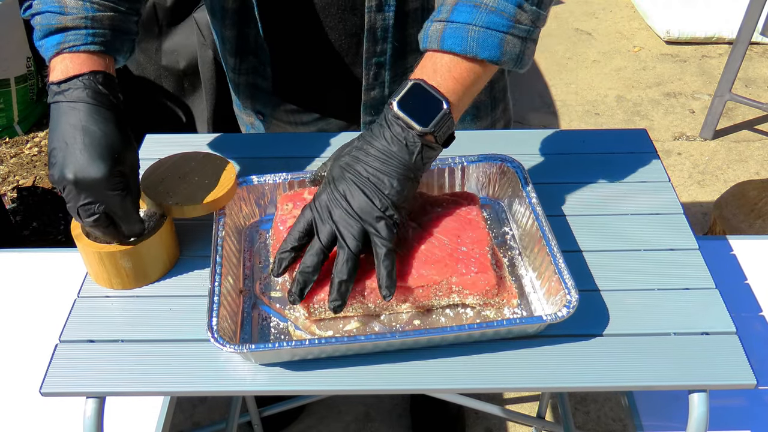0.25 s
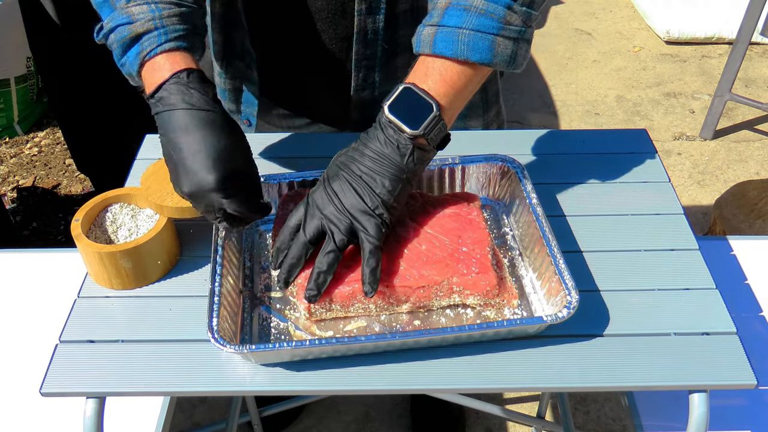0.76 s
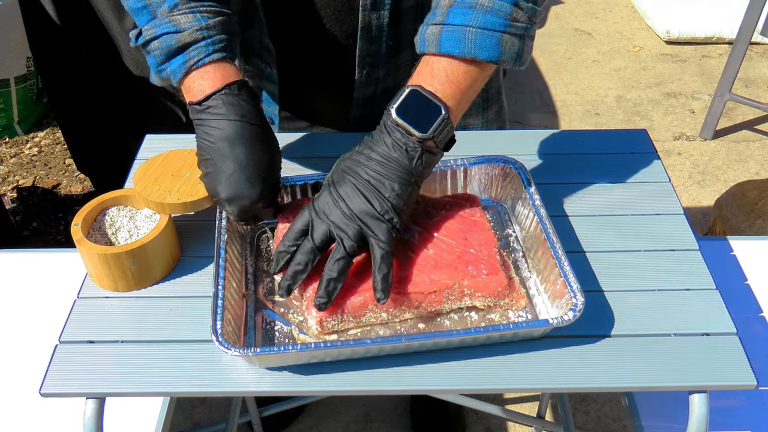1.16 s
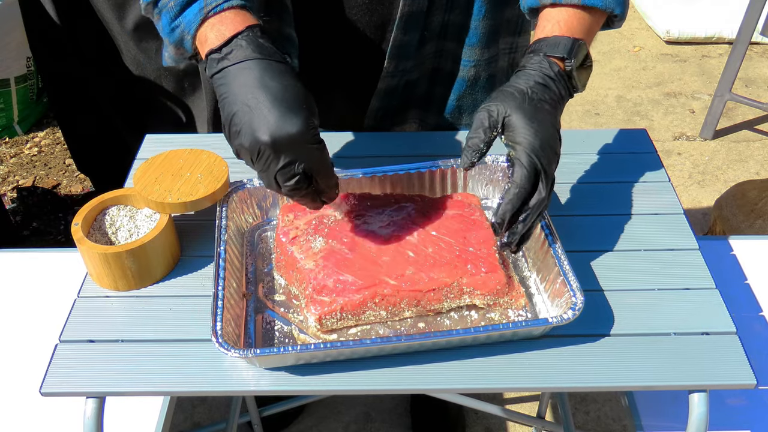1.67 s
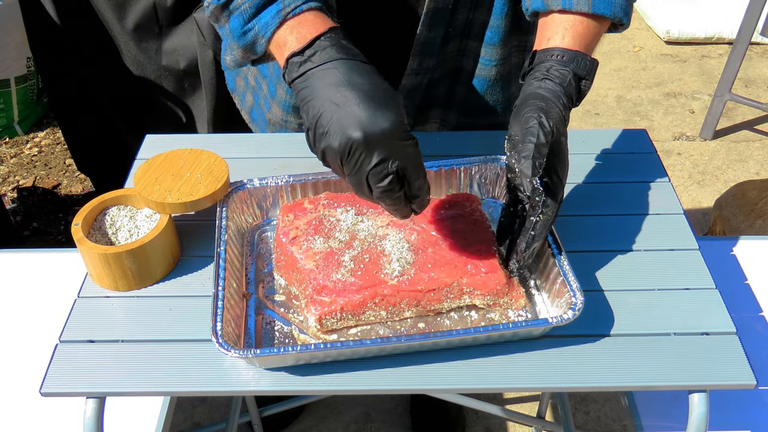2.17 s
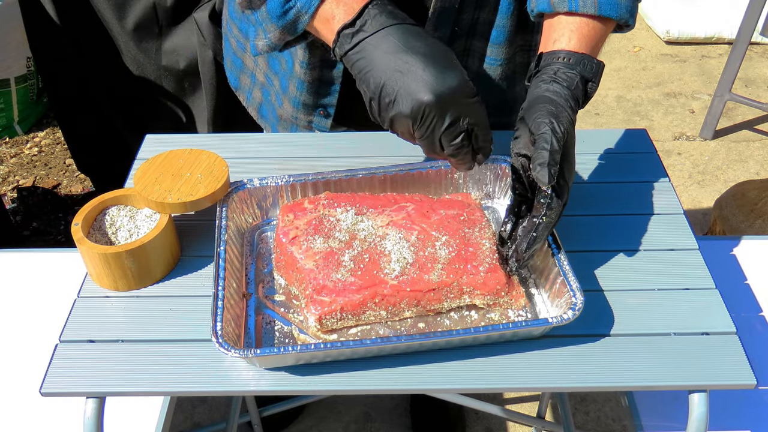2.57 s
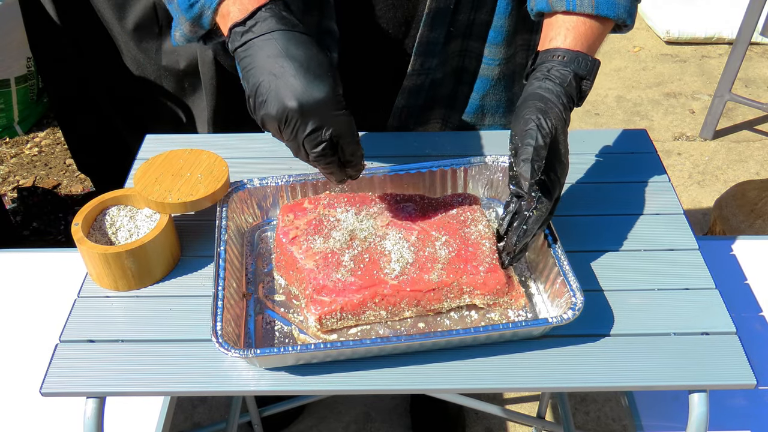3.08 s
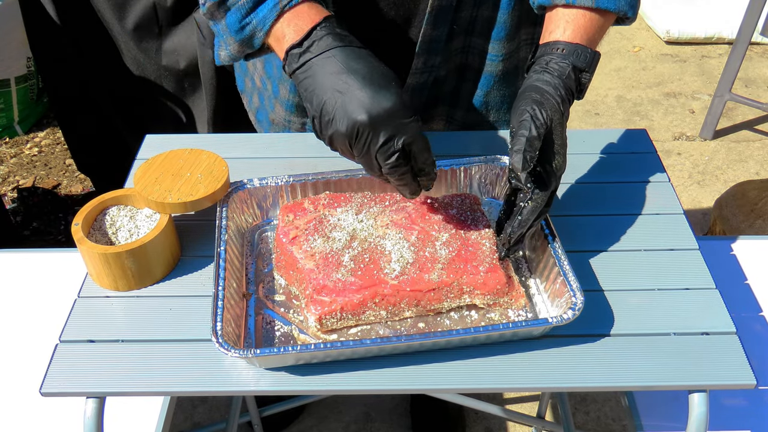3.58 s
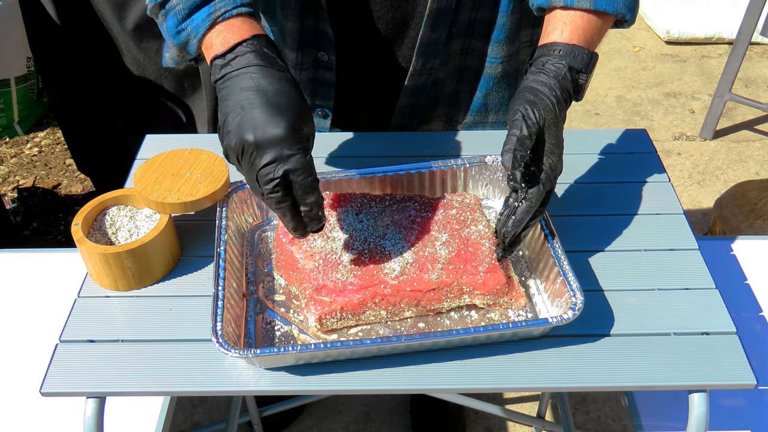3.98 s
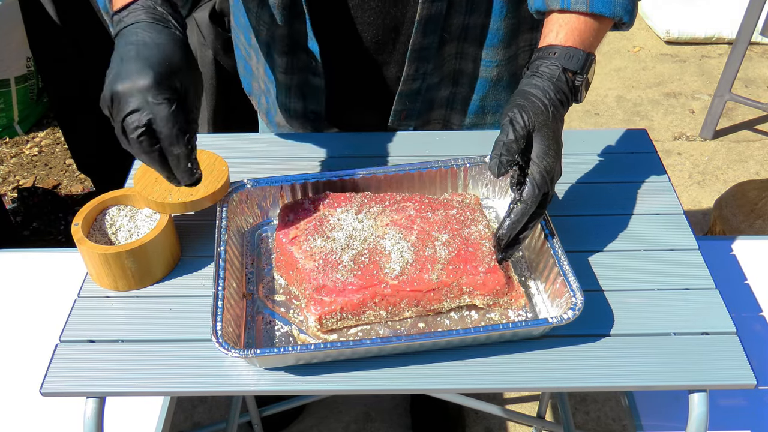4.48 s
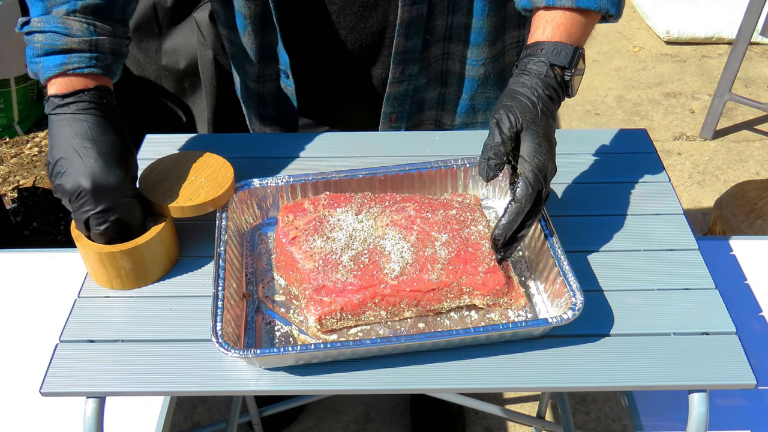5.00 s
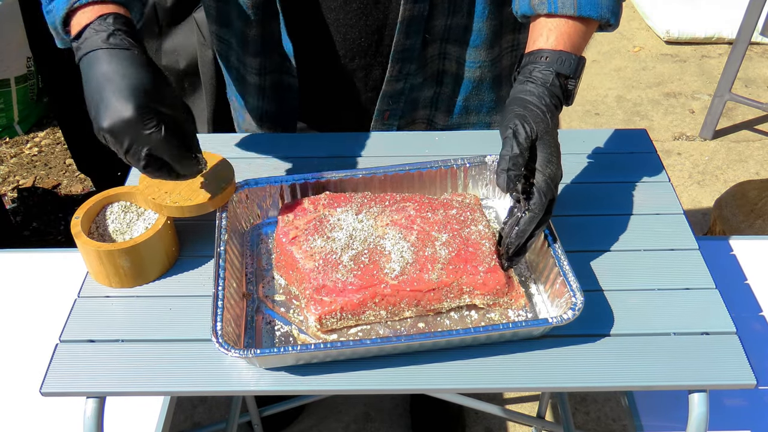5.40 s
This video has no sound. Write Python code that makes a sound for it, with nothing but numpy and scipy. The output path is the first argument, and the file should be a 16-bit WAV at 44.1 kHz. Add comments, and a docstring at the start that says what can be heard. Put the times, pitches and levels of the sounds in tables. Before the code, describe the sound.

Close outdoor sound of a disposable foil pan on a slatted table. A soft crunch of fingers in coarse salt comes first, then a short scrape with crinkling, scattered snaps, and a dense bright burst of crackling near the middle. It calms into another quiet salt scoop and one last pop. A low engine hum and faint airy hiss continue underneath.

```python
"""A thin aluminium foil pan snaps and crinkles under gloved fingers seasoning meat on an outdoor slatted table.
Each snap and tick starts a dense set of foil modes; fine random clicks add a rustle.
The pan scrapes by stick and slip, and knocks on the slats as ringing modes with a short chatter.
Fingers dig coarse salt from a wooden pot, as random grains through a resonance.
Behind them a slow engine hums, a train of firings through an exhaust, over shaped noise for open air."""
import sys
import numpy as np
from scipy import signal
from scipy.io import wavfile
from scipy.ndimage import uniform_filter1d

SR = 44100
rng = np.random.default_rng(int(sys.argv[2]) if len(sys.argv) > 2 else 0)


def dump(signal):
    """Clip the signal to [-1, 1] and save it as 16-bit WAV at the path in sys.argv[1]."""
    limited = np.clip(np.atleast_2d(signal).T, -1, 1)
    pcm = np.round(limited * 32767).astype(np.int16)
    wavfile.write(sys.argv[1], SR, pcm)


N = 249165
TIME = np.arange(N) / SR  # s

# modes of the loaded pan on the slats: f/Hz, level/dB, free t60/s
PAN_MODES = [(282, -8, 0.12), (302, -2, 0.17), (301, -3, 0.4), (408, -8, 0.056), (500.5, -7, 0.11),
             (544, -12.5, 0.19), (657, -6.5, 0.25), (715, -16, 0.45), (815, -29, 0.11), (867, -9, 0.16),
             (970, 1, 0.028), (1066, -8.5, 0.17), (1180, -9, 0.051), (1315, -10.5, 0.13),
             (1550, -17.5, 0.45), (1740, -27, 0.063), (2650, -6.5, 0.13)]
FIRINGS_HZ, FIRST_FIRING_S = 26.5406, 0.0150  # the engine's firing rate and first firing


def amp(db):
    """Decibels to gain."""
    return 10 ** (np.asarray(db) / 20)


def unit(x):
    """Scales to rms 1."""
    return x / np.sqrt(np.mean(x ** 2) + 1e-20)


def read(points, hz):
    """A spectrum's dB at any frequency, interpolated along log frequency."""
    f, db = np.transpose(points)
    return np.interp(np.log(hz + 1), np.log(f + 1), db)


def add(mix, s, sound):
    """Mixes a sound in at time s, in place."""
    part = mix[max(round(s * SR), 0):][:len(sound)]
    part += sound[:len(part)]


def colour(x, points, size=4096):
    """Causal (minimum-phase) filter of unit energy with the given spectrum."""
    log_gain = np.log(amp(read(points, abs(np.fft.fftfreq(size, 1 / SR)))))
    response = np.exp(np.conj(signal.hilbert(log_gain)))
    taps = np.fft.ifft(response).real[:size // 2]
    return signal.oaconvolve(x, taps / np.linalg.norm(taps))[:len(x)]


def band(x, low_hz, high_hz, order=2):
    """Butterworth band-pass."""
    edges_hz = [low_hz, min(high_hz, 0.49 * SR)]
    return signal.sosfilt(signal.butter(order, edges_hz, "band", fs=SR, output="sos"), x)


def stroke(middle_s, half_s):
    """A movement of the hand that swells and dies away smoothly."""
    return np.exp(-((TIME - middle_s) / half_s) ** 2)


def engine(hum_db=-54.0, uneven=0.044, waver_s=0.00029, puff_db=-68):
    """Each firing, a little uneven in time and strength, thumps through the exhaust with a puff of noise."""
    # exhaust response: multiple of the firing rate, level/dB
    exhaust = [(1, -20), (2, -20), (3, -38.5), (4, -4), (5, 3.5), (6, -6), (7, -6), (8, -14.5), (9, -27.5),
               (10, -17.5), (11, -28), (12, -21), (13, -45), (14, -34)]
    starts = np.arange(FIRST_FIRING_S, TIME[-1] - 0.005, 1 / FIRINGS_HZ)
    late, strength = rng.standard_normal((len(starts), 2)).T
    firings = np.zeros(N)
    places = ((starts + waver_s * late) * SR).astype(int)
    firings[np.clip(places, 0, N - 1)] = 1 + uneven * strength
    pipe = [(k * FIRINGS_HZ, db) for k, db in exhaust]
    pipe += [(600, -45), (1500, -62), (5000, -90)]  # the treble falls away
    hum = unit(colour(firings, pipe, size=16384))

    cycle = ((TIME - FIRST_FIRING_S) * FIRINGS_HZ) % 1  # 0-1 from one firing to the next
    puffs = band(rng.standard_normal(N), 220, 650) * np.exp(-((cycle - 0.26) / 0.3) ** 2)
    return amp(hum_db) * hum + amp(puff_db) * unit(puffs)


def casing(waver=0.29):
    """Faint overtones of the engine: steady sines whose phase wavers slowly (in radians)."""
    # casing hums: f/Hz, rms level/dB
    hums = [(292, -68.5), (345, -88.5), (372, -94), (452, -76), (637, -80.5)]
    knots = np.linspace(0, TIME[-1], 24)
    out = np.zeros(N)
    for hz, db in hums:
        drift = waver * np.interp(TIME, knots, rng.standard_normal(len(knots)))
        out += amp(db) * np.sqrt(2) * np.sin(2 * np.pi * hz * TIME + drift)
    return out


def air(air_db=-67.5, rumble_db=-63, hiss_db=0):
    """Open-air hiss that swells and sinks over a steady low rumble, both shaped noise."""
    # hiss spectrum: f/Hz, density/dB per Hz
    hiss_spectrum = [(180, -22.5), (300, -9.5), (315, -9), (455, -14.5), (528, -15), (645, -16.5),
                     (801, -12.5), (870, -14.5), (1840, -16.5), (3190, -24.5), (7200, -23.5), (14700, -27),
                     (16000, -29)]
    # slow swell of the hiss: t/s, level/dB
    swell = [(0, 6.5), (.8, 6.5), (1.8, 6), (2.05, 3), (2.4, 5), (3.7, 6), (4.5, 3.5), (5.0, 7), (5.6, 4)]
    # rumble spectrum: f/Hz, density/dB per Hz
    rumble_spectrum = [(20, -59), (40, 0), (55, 5), (90, 2.5), (200, 6.5), (330, 10), (450, -7),
                       (800, -29.5), (2000, -66)]
    hiss = amp(air_db + hiss_db) * colour(rng.standard_normal(N), hiss_spectrum)
    rumble = amp(rumble_db) * colour(rng.standard_normal(N), rumble_spectrum, size=16384)
    return hiss * amp(np.interp(TIME, *np.transpose(swell))) + rumble


def pan_ring(middle_hz, octaves, free):
    """The pan's modes after a blow whose energy lies around middle_hz; a hand on the rim shortens them."""
    t = TIME[:SR // 2]
    out = np.zeros(len(t))
    for hz, db, t60 in PAN_MODES:
        struck = np.exp(-(np.log2(hz / middle_hz) / octaves) ** 2)
        decay = amp(db - 60 * t / (t60 * free))
        out += struck * decay * np.sin(2 * np.pi * (hz * t + rng.random()))
    return out


def knocks(rattle_db=-2, rattle_t60=0.094, rattle_s=0.066, seat_s=0.0013,
           thud_db=-42, thud_t60=0.38, thud_rise_s=0.014, thud_at_s=1.035):
    """The pan drops back, chatters briefly on the slats and rings on; the table thuds softly as the slide stops."""
    # blows: t/s, level/dB, middle of spectrum f/Hz, breadth/octaves, share of the free ring time left by the hand/0-1
    blows = [(0.0, -45, 690, 1.84, 1), (1.3129, -34, 446, 2.3, 1), (1.524, -52, 517, 0.14, .8),
             (1.605, -42.5, 650, 0.16, 1), (1.695, -61, 694, 3.3, .8), (3.2435, -34, 930, 1.1, 0.5),
             (4.282, -43.5, 1250, 0.73, 0.8), (5.644, -36.5, 1910, 0.87, 0.7)]
    out, t = np.zeros(N), TIME[:SR // 2]
    for s, db, hz, octaves, free in blows:
        chatter = amp(rattle_db - 60 * t / (rattle_t60 * free)) / (1 + (t / rattle_s) ** 4)
        rattle = unit(band(rng.standard_normal(len(t)), hz * 0.42, hz * 2.36, order=4)) * chatter
        blow = pan_ring(hz, octaves, free) + rattle * octaves / 2  # broader blows rattle more
        add(out, s, amp(db) * blow * (1 - np.exp(-t / seat_s)))
    thud = unit(band(rng.standard_normal(len(t)), 88, 168, order=4))
    add(out, thud_at_s, thud * amp(thud_db - 60 * t / thud_t60) * (1 - np.exp(-t / thud_rise_s)))
    return out


def facet(t60, pitch_hz, count=220, size=4096, spread_db=4, top_damping=0.33,
          focus_db=6, focus_octaves=0.065, uneven_db=2):
    """One facet of foil flips: dense modes, lifted near its pitch, the high ones dying first (t60 is at 5 kHz)."""
    t = np.arange(size) / SR
    hz = 300 + 16000 * ((np.arange(count) + rng.random(count)) / count) ** 1.25
    gain = amp(spread_db * rng.standard_normal(count)) * rng.choice([-1, 1], count) * hz ** 0.1
    # each crease favours its own groups of modes
    shape = unit(uniform_filter1d(rng.standard_normal(count), size=9))
    focus = np.exp(-(np.log2(hz / pitch_hz) / focus_octaves) ** 2)
    gain = gain * amp(uneven_db * shape + focus_db * focus)
    life = t60 * (5000 / hz) ** top_damping
    poles = 2j * np.pi * hz - np.log(1000) / life
    # sum of dying cosines, evaluated as coarse steps times fine steps
    coarse = gain[:, None] * np.exp(poles[:, None] * t[::64])
    fine = np.exp(poles[:, None] * t[:64])
    return (coarse.T @ fine).real.ravel() / np.linalg.norm(gain)


def snaps(snap_db=-6, body_db=-1, top_db=0, t60=0.026, crack=1.9, crack_s=0.00018, yield_s=0.0012,
          usual_db=-30, body_per_db=-0.39, top_per_db=-0.47):
    """Each buckle runs across its facet and ends in a crack; its force sets the share of body and top."""
    # foil buckles: t/s, strength/dB, facet pitch f/Hz
    buckles = [(0.383, -47, 5590), (0.7824, -40.5, 3800), (0.9202, -30.5, 2040), (0.9632, -28.5, 3640),
               (0.9737, -27, 2800), (0.9813, -27, 2680), (1.0096, -30, 2780), (1.024, -32, 8310),
               (1.095, -37, 2870), (1.1106, -44, 7260), (1.1733, -24.5, 2780), (1.212, -32.5, 5160),
               (1.2437, -32, 6250), (1.3126, -19.5, 12130), (1.3837, -27.5, 2620), (1.5231, -19.5, 6200),
               (1.53, -29, 2800), (1.6029, -23.5, 13200), (1.663, -30.5, 9300), (1.694, -27, 4300),
               (1.9655, -46, 13000), (1.988, -39, 4350), (2.2967, -28, 5850), (2.3124, -39, 11400),
               (2.363, -29, 4900), (2.3711, -30.5, 4930), (2.531, -29.5, 5530), (2.5738, -25.5, 6800),
               (2.6068, -29.5, 9000), (2.6665, -27.5, 8700), (2.7257, -27, 10740), (2.7306, -19, 4740),
               (2.7446, -16.5, 2120), (2.7565, -22, 12300), (2.7764, -26, 12500), (2.829, -24, 8700),
               (2.8394, -29, 12200), (2.8493, -22, 9860), (2.8661, -20, 12000), (2.8819, -26, 12200),
               (2.921, -27, 11800), (3.0128, -24.5, 3000), (3.0633, -33, 11200), (3.109, -28.5, 8800),
               (3.119, -37, 3750), (3.155, -33.5, 11100), (3.197, -36, 12400), (3.2415, -18, 11700),
               (3.2454, -19.5, 2550), (3.366, -33.5, 11800), (3.4221, -30, 6100), (3.4532, -28.5, 5700),
               (3.469, -26, 5700), (3.4753, -19, 4800), (3.495, -31, 12400), (3.5738, -33.5, 5940),
               (3.626, -39, 7040), (3.726, -41, 4530), (3.7415, -27.5, 2700), (3.7606, -27, 4450),
               (3.8764, -30.5, 2320), (3.894, -27, 7000), (3.9067, -33, 5300), (3.916, -23, 11500),
               (3.98, -34.5, 2400), (4.0179, -23, 6030), (4.0292, -32, 6800), (4.054, -26.5, 5800),
               (4.1258, -31, 12700), (4.2078, -37, 11400), (4.2323, -34, 4350), (4.274, -39, 10100),
               (4.2822, -19, 6600), (4.3238, -27.5, 2410), (5.634, -33.5, 2750), (5.6444, -19.5, 3050)]
    out = np.zeros(N)
    for s, db, pitch_hz in buckles:
        ring = facet(t60, pitch_hz, spread_db=5.5, focus_db=10.0, focus_octaves=0.13, uneven_db=3.5)
        t = TIME[:len(ring)]
        ring *= np.minimum(t / yield_s, 1) ** 2
        burst = rng.choice([-1, 1], len(t)) * np.exp(-t / crack_s)
        add(ring, yield_s, crack * burst / np.linalg.norm(burst))
        body = band(ring, 300, 1900, order=1)
        top = band(ring, 8500, 20000, order=1)
        # a harder buckle keeps more of its energy in the facet's middle range
        force_db = db - usual_db
        ring += (amp(body_db + body_per_db * force_db) - 1) * body
        ring += (amp(top_db + top_per_db * force_db) - 1) * top
        add(out, s, amp(db + snap_db) * ring)
    return out


def salt(crunch_db=-1, width_hz=1200, grains_per_s=1100):
    """Crystals grind together; the hollow between hand and pot colours each dig."""
    # digs in the pot: middle t/s, half length/s, level/dB, pot resonance f/Hz, crystal fizz/dB
    digs = [(0.485, 0.038, -54.5, 1160, -13), (4.783, 0.031, -74, 2920, 9.5),
            (4.876, 0.032, -58.5, 850, -11), (5.048, 0.089, -65, 1520, 5), (5.147, 0.026, -63.5, 1690, -1)]
    # crystal fizz spectrum: f/Hz, density/dB per Hz
    crystals = [(200, -36), (500, 12), (1000, 12.5), (2600, 0.5), (4000, 0), (7000, -15), (10000, -40),
                (16000, -41)]
    out = np.zeros(N)
    for s, half_s, db, hz, fizz_db in digs:
        grains = (rng.random(N) < grains_per_s / SR) * rng.standard_normal(N)
        pole = np.exp((2j * np.pi * hz - np.pi * width_hz) / SR)
        hollow = signal.lfilter([1], np.poly([pole, pole, pole]), grains).real
        crunch = amp(crunch_db) * unit(hollow)
        fizz = amp(fizz_db) * unit(colour(grains, crystals))
        out += amp(db) * stroke(s, half_s) * (crunch + fizz)
    return out


def drag(ring_db=0, rasp_db=-8, grit_db=-17, slips_per_s=1600, judder_hz=301, wander=0.034):
    """The pan's base sticks and slips on gritty slats; random slips ring its modes, locked slips judder on a low one."""
    # shoves along the table: middle t/s, half length/s, level/dB, judder relative to it/dB
    shoves = [(0.919, 0.0054, -47, 3.5), (0.993, 0.038, -36.5, 0), (1.056, 0.049, -50.5, -9),
              (1.224, 0.023, -54, -8.5), (1.296, 0.0074, -54, -12)]
    # how strongly slips drive each mode: f/Hz, level/dB
    slip_force = [(250, -16), (310, -19), (420, 20), (650, 9.5), (780, 21), (900, 13.5), (1400, 13),
                  (1900, 4.5)]
    slips = (rng.random(N) < slips_per_s / SR) * rng.uniform(0.36, 1, N) * rng.choice([-1, 1], N)
    speed = sum(amp(db) * stroke(s, half_s) for s, half_s, db, _ in shoves)
    t = TIME[:SR // 4]
    ring = np.zeros(N)
    for hz, db, t60 in PAN_MODES:
        decay = amp(-60 * t / min(t60, 0.12))  # contact with the slats limits the ring
        mode = signal.oaconvolve(slips * speed, decay * np.cos(2 * np.pi * hz * t))[:N]
        ring += amp(db + read(slip_force, hz)) * np.sqrt(t60) * unit(mode)
    ring *= amp(ring_db) * np.linalg.norm(speed) / np.linalg.norm(ring)

    rasp = amp(rasp_db) * unit(band(slips, 218, 1540, order=4))
    grit = amp(grit_db) * unit(band(slips, 2500, 3300))

    drift = wander * unit(band(rng.standard_normal(N), 2.9, 82))
    turns = np.cumsum(judder_hz * (1 + drift)) / SR
    locked = sum(amp(db + judder_db) * stroke(s, half_s) for s, half_s, db, judder_db in shoves)
    judder = locked * np.sqrt(2) * np.sin(2 * np.pi * turns)
    return ring + judder + speed * (rasp + grit)


def pressure(rise_s=0.011, release_s=0.024):
    """Finger pressure on the foil: each press takes hold quickly, holds, and relaxes."""
    # presses that work small creases: start t/s, hold/s, level/dB
    presses = [(0.95, 0.064, -50.5), (1.031, 0.21, -50), (1.31, 0.022, -51.5), (1.597, 0.076, -57),
               (1.972, 0.94, -64), (2.58, 0.013, -43), (2.703, 0.0093, -46), (2.734, 0.02, -37.5),
               (2.752, 0.065, -46), (2.833, 0.054, -41), (2.897, 0.14, -49.5), (3.062, .16, -54.5),
               (3.277, 0.044, -44), (3.421, 0.0088, -39), (3.482, 0.066, -51.5), (3.742, 0.032, -49.5),
               (3.864, 0.064, -46.5), (4.021, 0.085, -56.5)]
    out = np.zeros(N)
    for s, hold_s, db in presses:
        before = np.minimum(TIME - s, 0)
        after = np.maximum(TIME - s - hold_s, 0)
        out += amp(db) * np.exp(before / rise_s - after / release_s)
    return out


def crinkle(crinkle_db=-4, per_s=420, size_db=7.5, t60=0.028, count=32,
            rustle_db=-12, rustle_per_s=4000, low_hz=650):
    """Many tiny ticks in the foil at random, faster as the fingers work harder, over a fine rustle."""
    press = pressure()
    rate = per_s * (press / press.max()) ** 0.39
    fires = rng.random(N) < rate / SR
    size = amp(size_db * np.minimum(rng.exponential(1, N), 2))
    # sparser ticks are made larger, so that the level follows the pressure
    clicks = fires * unit(size) * press * np.sqrt(SR / (rate + 1))
    which = rng.integers(0, count, N)
    rings = [facet(t60, hz) for hz in np.geomspace(2000, 14000, count)]
    rings = [ring / np.linalg.norm(ring) for ring in rings]
    ticks = np.zeros(N)
    for i in np.flatnonzero(fires):
        add(ticks, i / SR, clicks[i] * rings[which[i]])
    rustle = press * unit((rng.random(N) < rustle_per_s / SR) * rng.standard_normal(N))
    return band(amp(crinkle_db) * ticks + amp(rustle_db) * rustle, low_hz, SR / 2, order=1)


def foil(x, ring_db=-12, ring_t60=0.014):
    """The whole sheet colours every buckle and tick and rings briefly after it."""
    # sheet colour: f/Hz, density/dB per Hz
    sheet = [(250, -20.5), (450, -2.5), (700, -20.5), (950, -3.5), (1500, 1), (1900, -3.5), (2400, -3.5),
             (3100, -1.5), (4700, 0.5), (8100, 1.5), (12200, 2), (14500, 0), (16000, -3.5)]
    # modes of the pan's floor and walls: f/Hz, level/dB
    floor_modes = [(729, 0), (930, 9), (1130, 1), (1283, -9), (1490, 2.5), (2450, 4), (2710, 1.5),
                   (3615, 6), (4730, 4.5), (5780, -3)]
    t = TIME[:SR // 5]
    ring = sum(amp(db - 60 * t / ring_t60) * np.cos(2 * np.pi * hz * t) for hz, db in floor_modes)
    ringing = signal.oaconvolve(x, ring / np.linalg.norm(ring))[:N]
    return colour(x, sheet) + amp(ring_db) * ringing


def yard(x, near_db=-13, tail_db=-22, t60=0.97):
    """Table and body throw the crackle back at once; the yard adds a faint tail cut off at half a second."""
    t = TIME[:SR // 2]
    near = rng.standard_normal(len(t)) * np.exp(-((t - 0.009) / 0.006) ** 2)
    tail = rng.standard_normal(len(t)) * amp(-60 * t / t60) * (t > 0.01)
    echoes = amp(near_db) * near / np.linalg.norm(near) + amp(tail_db) * tail / np.linalg.norm(tail)
    return x + signal.oaconvolve(x, echoes)[:N]


def scene():
    """Pan and salt close by, engine and air behind."""
    behind = engine() + casing() + air()
    crackle = yard(foil(snaps() + crinkle()))
    return (behind + knocks() + salt() + drag() + crackle)[None]


def record(dry, low_cut_hz=46, edge_hz=15950):
    """A steep low cut against wind, then a linear-phase limit on the treble."""
    cut = signal.sosfilt(signal.butter(6, low_cut_hz, "high", fs=SR, output="sos"), dry)
    taps = signal.firwin(511, edge_hz, window=("kaiser", 9), fs=SR)
    return signal.oaconvolve(cut, taps[None], "same")


dry = scene()
out = record(dry)
dump(out)
```